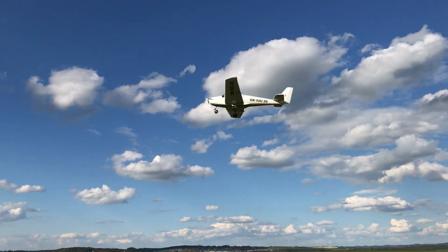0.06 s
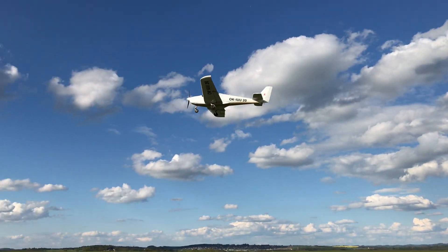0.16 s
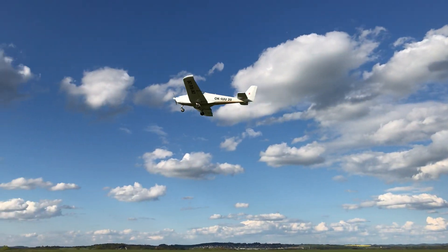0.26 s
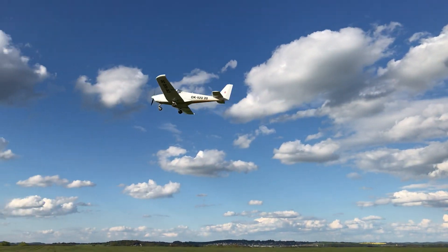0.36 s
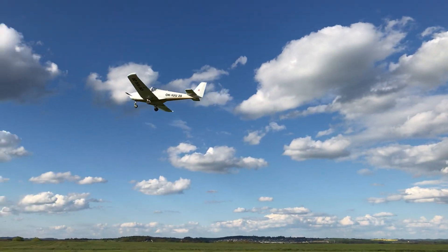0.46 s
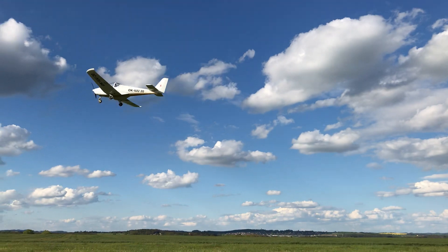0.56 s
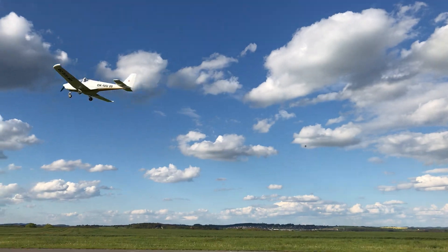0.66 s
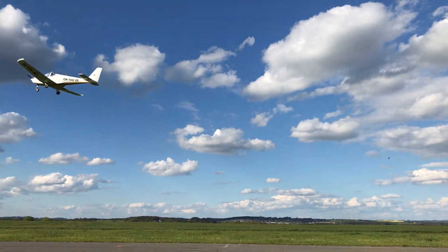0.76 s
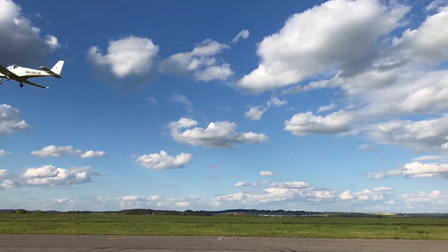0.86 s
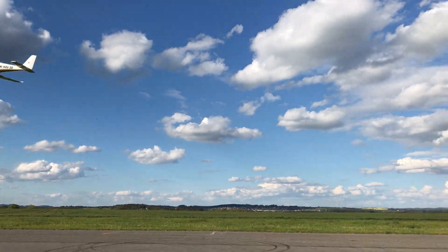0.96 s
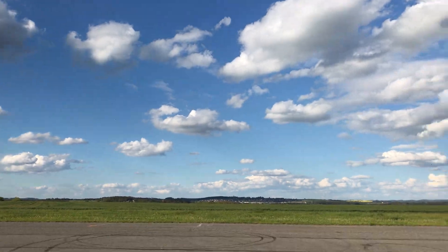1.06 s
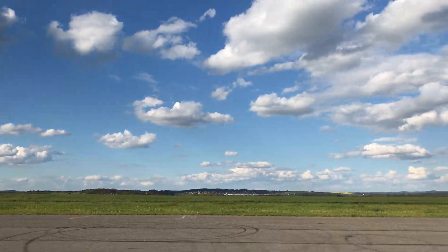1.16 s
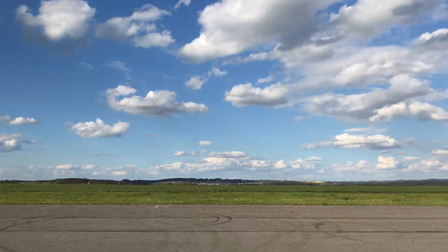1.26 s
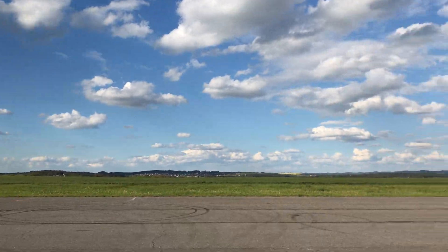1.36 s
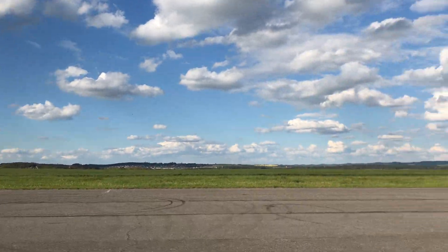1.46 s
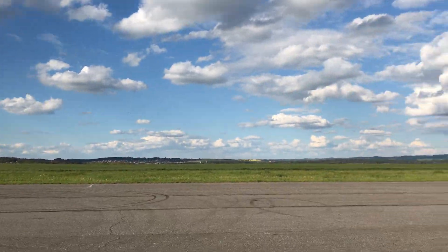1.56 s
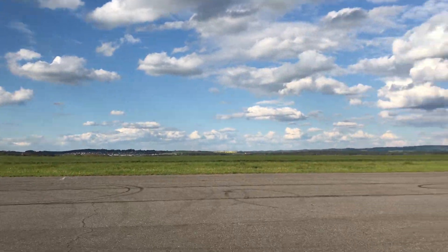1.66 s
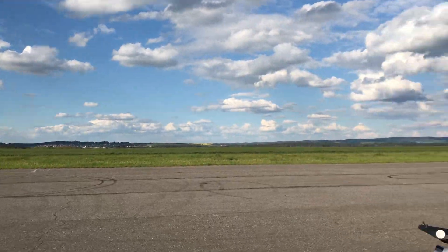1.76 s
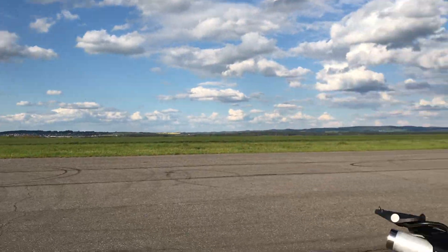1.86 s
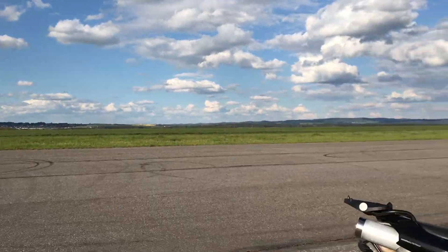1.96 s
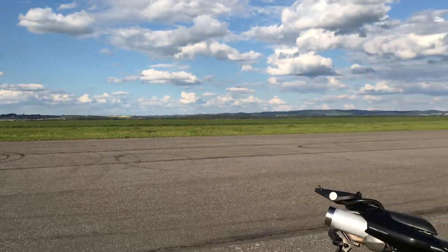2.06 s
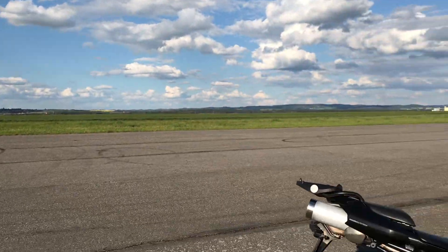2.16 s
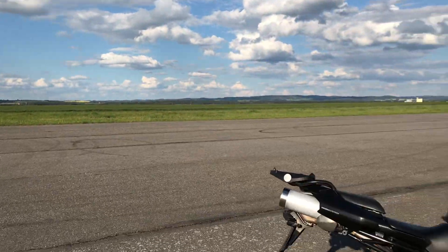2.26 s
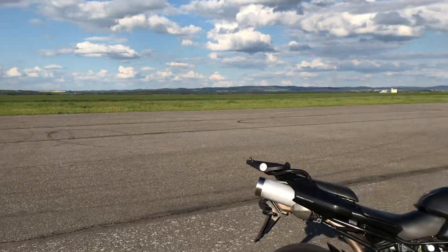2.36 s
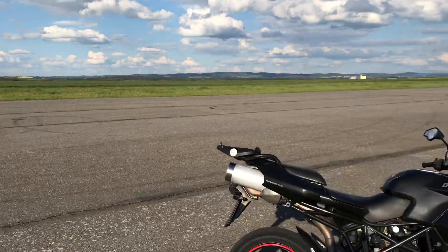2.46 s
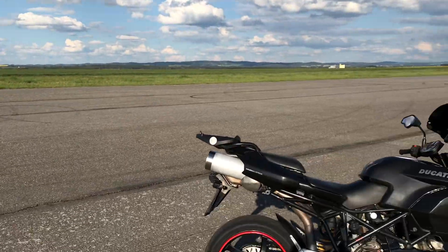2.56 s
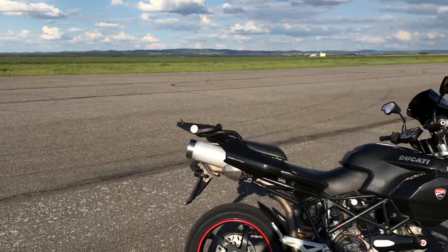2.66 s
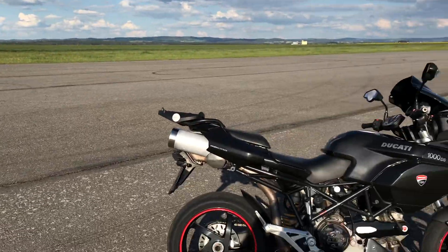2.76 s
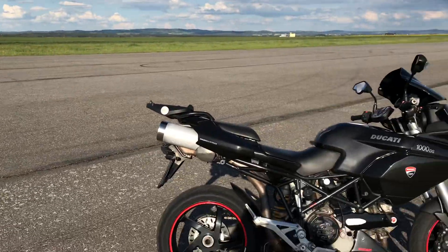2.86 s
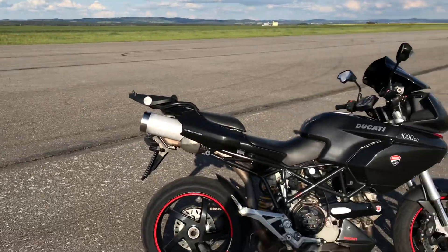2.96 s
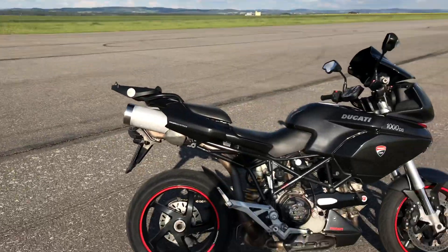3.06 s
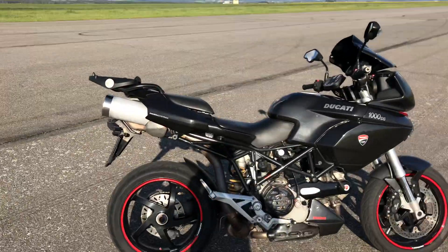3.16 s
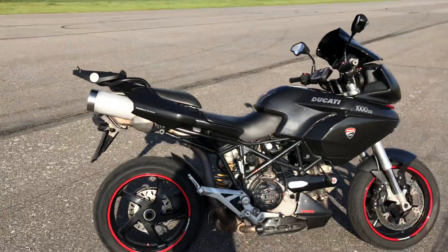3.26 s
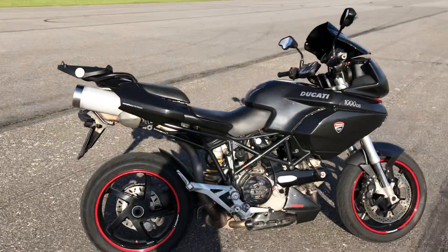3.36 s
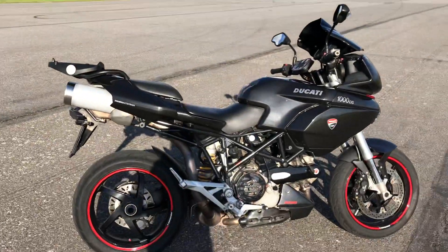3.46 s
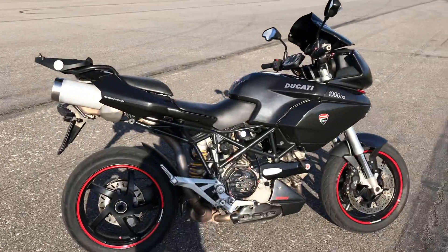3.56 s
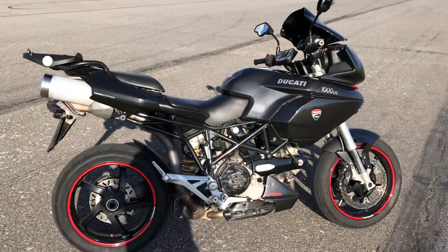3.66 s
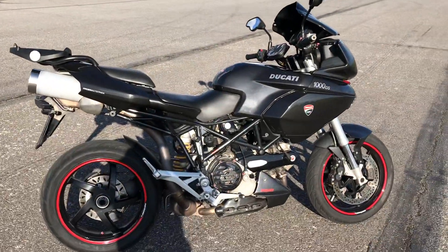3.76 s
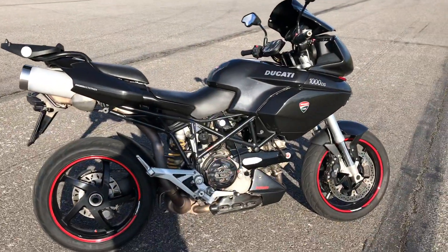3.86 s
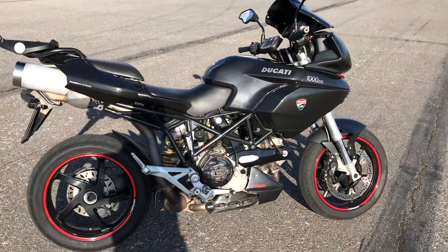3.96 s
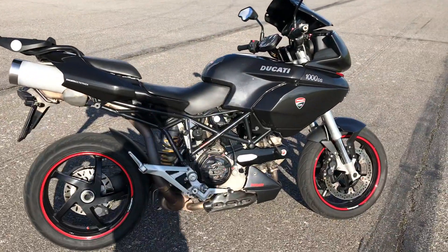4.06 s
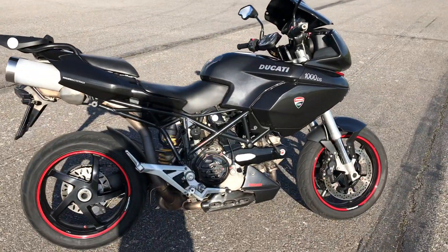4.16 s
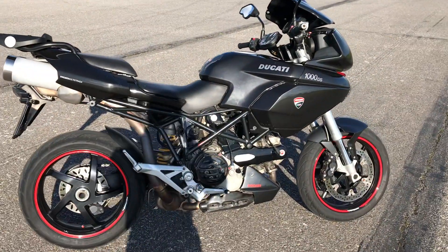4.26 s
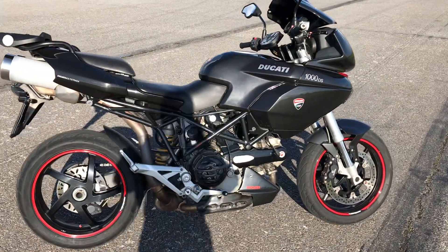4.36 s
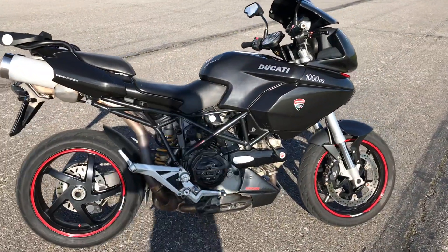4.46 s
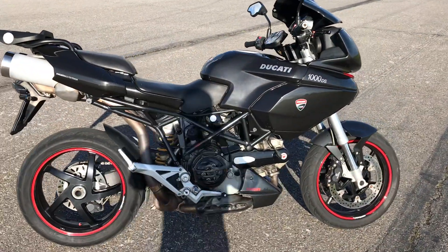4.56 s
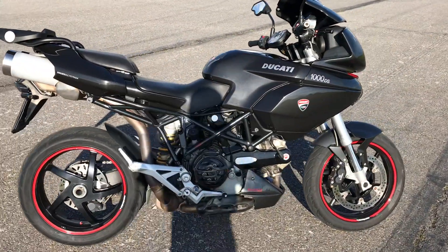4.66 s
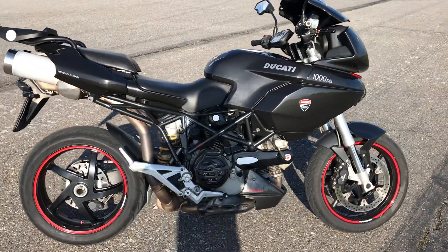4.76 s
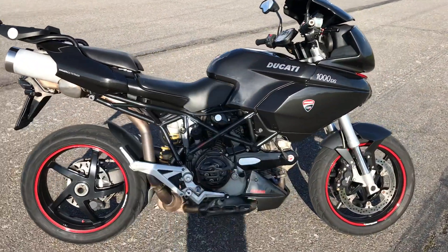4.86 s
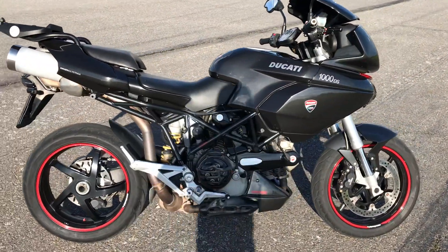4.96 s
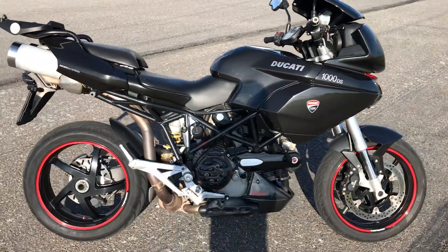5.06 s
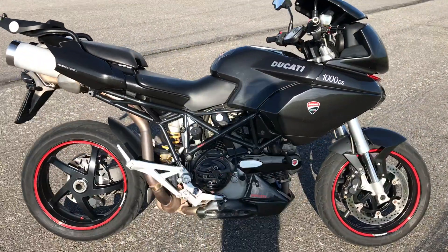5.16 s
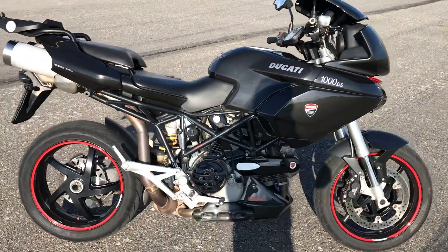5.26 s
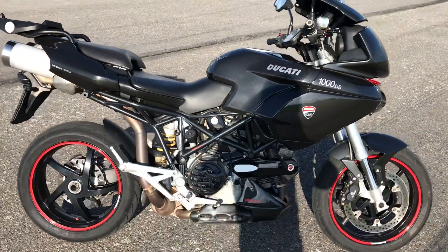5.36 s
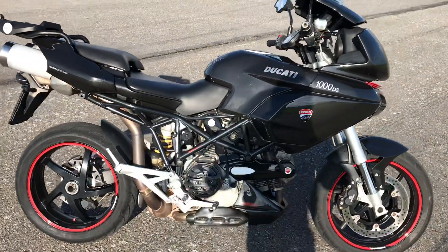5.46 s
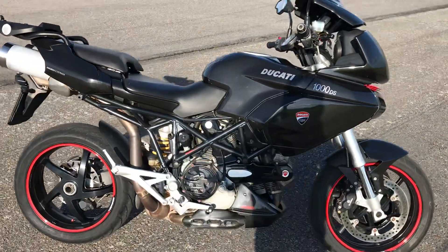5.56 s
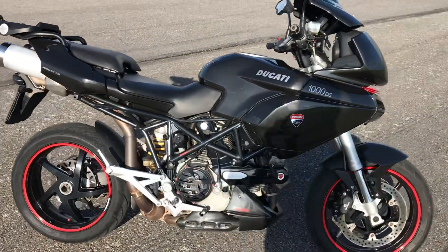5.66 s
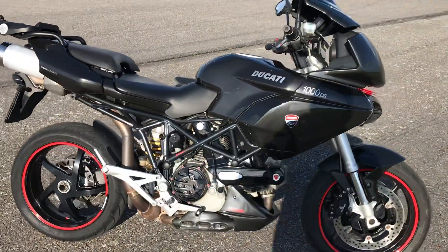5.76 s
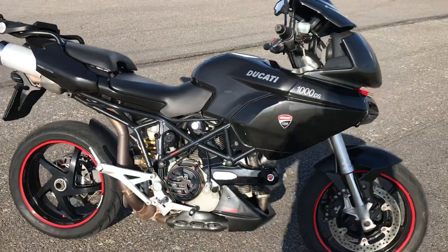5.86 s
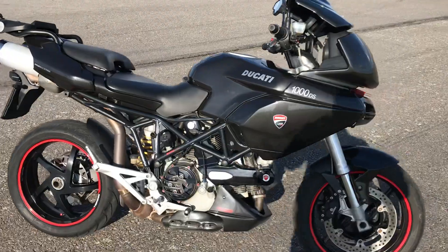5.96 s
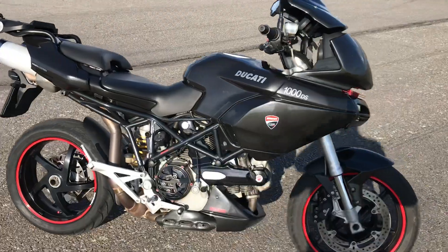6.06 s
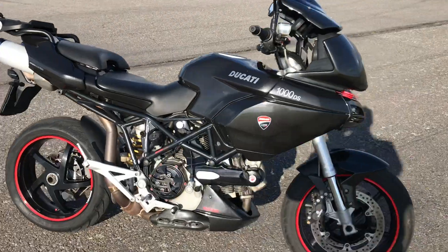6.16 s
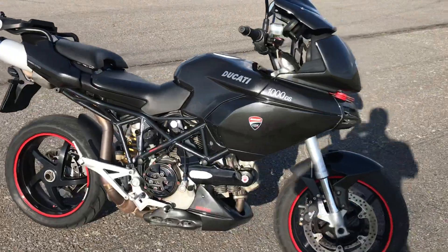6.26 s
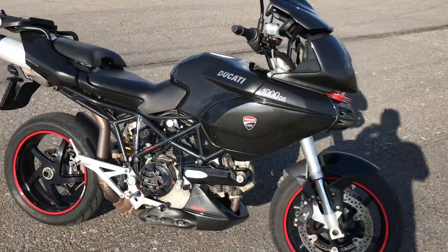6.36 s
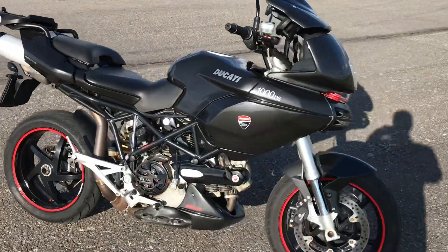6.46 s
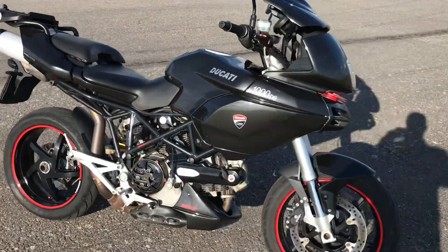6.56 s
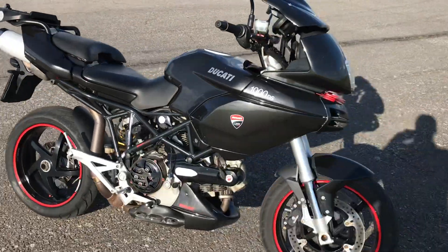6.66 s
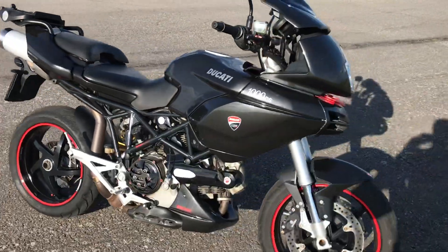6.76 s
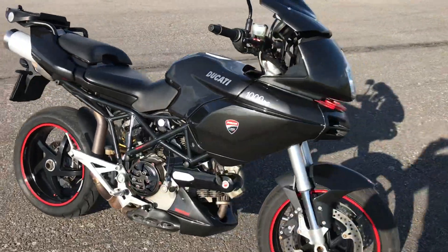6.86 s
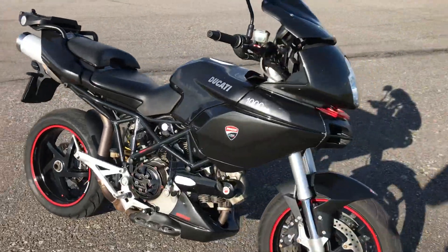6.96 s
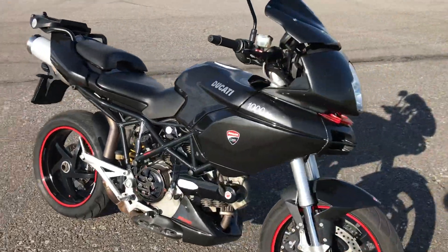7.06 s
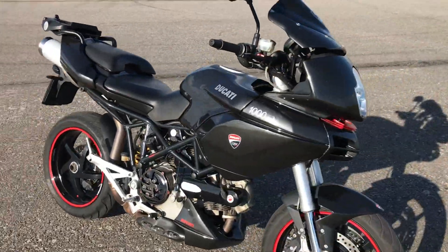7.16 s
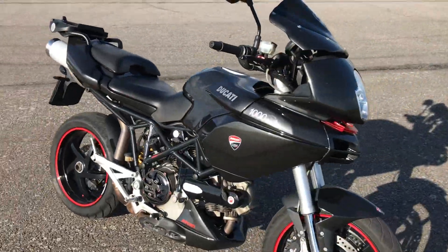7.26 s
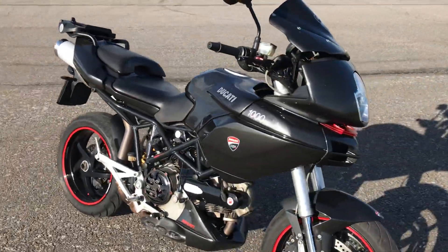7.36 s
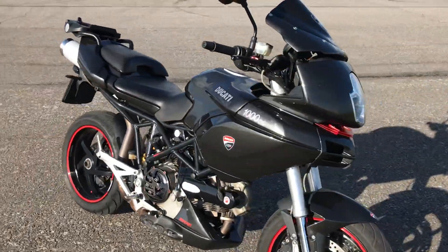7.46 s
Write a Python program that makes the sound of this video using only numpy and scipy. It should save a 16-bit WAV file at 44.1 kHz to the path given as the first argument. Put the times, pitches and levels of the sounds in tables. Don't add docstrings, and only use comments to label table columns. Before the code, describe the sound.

Raspy droning light aircraft passes close and recedes, growing dull and distant, followed by low wind buffets and thin bird chirps over an airfield.

```python
import sys
import numpy as np
from scipy import signal
from scipy.fft import rfft, irfft
from scipy.io import wavfile

SR = 44100
rng = np.random.default_rng(int(sys.argv[2]) if len(sys.argv) > 2 else 0)


def store_wav(level_fs):
    pcm = np.round(np.clip(np.atleast_2d(level_fs), -1, 1) * 32767)
    wavfile.write(sys.argv[1], SR, pcm.T.astype(np.int16))


def elevation(decibels):
    levels = np.asarray(decibels, float)
    return 10 ** (levels / 20)


N = 330750
TIME = np.arange(N) / SR
BLADES_PER_CYCLE = 1.758


def rms_one(x):
    return x / np.sqrt(np.mean(x ** 2) + 1e-20)


def in_time(rows):
    s, *columns = np.transpose(rows)
    return [np.interp(TIME, s, c) for c in columns]


def swells(rows):
    bells = [db * np.exp(-.5 * ((TIME - s) / length) ** 2) for s, db, length in rows]
    return np.max(bells, axis=0)


def by_bearing(behind, values):
    return np.interp(behind, np.linspace(0, 1, 3), values)


def drift(rate):
    r = np.exp(-80 * np.pi * rate / SR)
    slow = signal.lfilter([1], [1, -2 * r, r * r], rng.standard_normal(N // 40 + 2002))[2000:]
    return np.interp(np.arange(N) / 40, np.arange(len(slow)), rms_one(slow))


def colour(x, points):
    hz, db = np.transpose(points)
    grid = np.fft.rfftfreq(8192, 1 / SR) + 1
    gain = elevation(np.interp(np.log(grid), np.log(hz), db))
    cepstrum = irfft(np.log(gain))
    cepstrum[1:4096] *= 2
    response = irfft(np.exp(rfft(cepstrum[:4097], 8192)))
    return rms_one(signal.oaconvolve(x, response)[:N])


def band(x, edge_hz, kind, order=2):
    return signal.sosfilt(signal.butter(order, edge_hz, kind, fs=SR, output="sos"), x)


# pitch_hz, level_db (per Hz)
FIELD_SPECTRUM = [(40, -4), (300, -15.5), (1000, -16), (4000, 5), (7000, -16), (10000, -17), (15500, -18.5)]


def open_field():
    return elevation(-65.5) * colour(rng.standard_normal(N), FIELD_SPECTRUM)


# start_s, length_s, start_pitch_hz, end_pitch_hz, level_db
LARK_WHISTLES = [(4.533, 0.053, 3040, 3000, -48), (5.473, 0.04, 3580, 3600, -55.5),
                 (5.565, 0.018, 5900, 5750, -65), (5.583, 0.022, 5470, 5230, -58),
                 (5.645, 0.023, 5250, 5000, -60), (5.667, .015, 4400, 4450, -55),
                 (5.723, 0.018, 5250, 5000, -57), (5.782, 0.096, 3700, 3680, -50.5),
                 (6.54, .09, 4830, 4810, -55), (6.638, .03, 4800, 4300, -57),
                 (6.83, 0.017, 5400, 5550, -58), (6.853, .015, 5650, 5500, -63),
                 (6.928, 0.027, 3630, 3650, -51.5)]
# start_s, length_s, start_pitch_hz, end_pitch_hz, level_db
LARK_TRILLS = [
    (5.888, .15, 3680, 3630, -49.5),
    (6.177, 0.32, 3650, 3540, -48.5),
    (6.356, .082, 4660, 4700, -52.5),
    (6.391, 0.055, 3750, 3670, -43.5),
    (6.795, .03, 4900, 4300, -50),
    (6.915, .045, 4500, 4000, -49),
    (7.205, 0.021, 4170, 3440, -48),
    (7.29, .05, 3800, 3750, -52),
    (7.461, 0.028, 4180, 4160, -43.5),
]


def lark():
    trill_depth, throbs_per_s, swing_hz, breath_hz = 0.67, 95, 170, 460
    out = np.zeros(N)
    notes = [(*note, 0) for note in LARK_WHISTLES] + [(*note, trill_depth) for note in LARK_TRILLS]
    for s, length, start_hz, end_hz, db, trill in notes:
        u = np.arange(round(length * SR)) / SR
        throb = np.sin(2 * np.pi * throbs_per_s * u)
        hz = start_hz + (end_hz - start_hz) * u / length + swing_hz * trill * throb
        hz = hz + breath_hz * rng.standard_normal(len(u))
        shape = np.sin(np.pi * u / length) ** .5 * (1 - .5 * trill * (1 + throb))
        out[round(s * SR):][:len(u)] += elevation(db) * shape * np.sin(2 * np.pi * np.cumsum(hz) / SR)
    return out


# start_s, level_db
CASING_TICKS = [
    (6.853, -45),
]


def casing_tick():
    out = np.zeros(N)
    for s, db in CASING_TICKS:
        out[round(s * SR):][:60] = elevation(db) * rng.standard_normal(60) * np.exp(-np.arange(60) / 15)
    return band(out, (8000, 12500), "band", order=3)


# centre_s, rise_db, length_s
WIND_GUSTS = [(0, 13.5, 0.88), (1.7, 5, 0.095), (2.85, 7.5, 0.13), (3.953, 10.5, 0.073), (3.577, 7.5, 0.19),
              (4.21, 9, 0.33), (4.593, 5, 0.36), (4.97, 10.5, 0.16), (5.42, 9.5, 0.21),
              (5.685, 11.5, 0.075), (5.995, 2.5, 0.15), (6.855, 4.5, 0.21)]


def wind():
    breeze_db, all_bright_db = -43, 30.5
    gust_db = swells(WIND_GUSTS)
    white = band(rng.standard_normal(N), 48.4, "high", order=4)
    dull = rms_one(band(white, 97, "low", order=3))
    bright = rms_one(band(white, 177, "low", order=3))
    share = np.clip(0.48 + gust_db / all_bright_db / 2, 0, 1)
    lumps_db = 3.2 * drift(24)
    return elevation(breeze_db + gust_db + 1 + lumps_db) * ((1 - share) * dull + share * bright)


# centre_s, peak_db, top_hz, length_s
PORT_BUFFETS = [(3.523, -15.5, 121, 0.0072), (3.668, -21, 526, 0.004), (4.232, -45, 397, 0.0091),
                (4.367, -25, 296, 0.011), (4.752, -29, 800, 0.0028), (4.942, -14.5, 226, 0.018),
                (5.012, -15, 624, 0.0039), (5.047, -14, 515, 0.0069), (5.059, -12.5, 118, 0.0099),
                (5.443, -15.5, 690, 0.0057), (5.458, -22, 1100, 0.0046), (5.466, -7.5, 400, 0.0084),
                (5.484, -21, 304, 0.0097), (5.575, -27, 504, 0.01), (5.667, -25, 620, 0.011),
                (5.704, -22, 193, 0.0083), (5.731, -25, 620, 0.0071), (5.899, -29.5, 900, 0.0027),
                (6.02, -41.5, 200, 0.012), (6.878, -23, 110, 0.0052)]
# centre_s, peak_db, top_hz
PORT_EDDIES = [(3.418, -22, 114), (3.458, -19.5, 163), (3.512, -43, 120), (3.556, -16.5, 186),
               (3.591, -19.5, 150), (3.624, -30, 150), (3.655, -20.5, 159.7), (3.695, -17.5, 175),
               (3.737, -25, 170), (3.786, -31.5, 95), (3.838, -28.5, 161), (3.904, -23.5, 115),
               (3.97, -24, 185), (3.993, -25.5, 129), (4.051, -26.5, 140), (4.097, -26.5, 135),
               (4.192, -26.5, 181), (4.244, -20.5, 170), (4.265, -20, 171), (4.285, -18.5, 178),
               (4.401, -32.5, 140), (4.463, -24, 128), (4.496, -24, 150), (4.547, -23.5, 131),
               (4.584, -21, 120), (4.7, -23.5, 141), (4.765, -23, 142), (5.099, -31.5, 139),
               (5.164, -22.5, 161), (5.402, -22, 120), (5.519, -29.5, 190), (5.631, -27, 151),
               (5.861, -28, 198), (5.908, -27.5, 105), (6.006, -20.5, 129), (6.206, -27.5, 100)]


def buffets():
    eddy_cycles, push_share, push_pitch = 1.01, 1.23, 0.498
    rows = PORT_BUFFETS + [(s, db, hz, eddy_cycles / hz) for s, db, hz in PORT_EDDIES]
    out = np.zeros(N)
    around = np.arange(-4000, 4000) / SR
    for s, db, top_hz, length in rows:
        dull = band(rng.standard_normal(8000), top_hz, "low", order=4)
        rush = rms_one(band(dull, 0.11 * top_hz, "high"))
        push = push_share * np.cos(2 * np.pi * push_pitch * top_hz * around)
        puff = (rush - push) * np.exp(-.5 * (around / length) ** 2)
        out[round(s * SR) - 4000:][:8000] += elevation(db) * puff / np.abs(puff).max()
    return band(out, 45, "high", order=3)


# time_s, lag_ms
ECHO_DELAY = [(0, 3.2), (.45, 3.22), (1, 2.86), (1.4, 2.5), (1.75, 2.14), (2.2, 1.82), (2.6, 1.56),
              (3.1, 1.3), (4.3, 1.24), (4.6, 1.03), (7.5, 1.07)]


def flight():
    speed_m_s, nearest_m, nearest_s = 39.37, 63.55, .098
    cycles_per_s, spin_up_per_s = 47.982, .00124
    throttle_s, throttle_per_s = 6.8, .008
    along = speed_m_s * (TIME - nearest_s)
    bearing = along / np.hypot(along, nearest_m)
    pushed = throttle_per_s * np.maximum(TIME - throttle_s, 0)
    revs = cycles_per_s * (1 + spin_up_per_s * TIME + pushed)
    heard_per_s = revs / (1 + speed_m_s * bearing / 343)
    return heard_per_s, in_time(ECHO_DELAY)[0], np.clip((bearing - 0.18) / 0.73, 0, 1)


# place_cycles, level_db
CYLINDER_FIRINGS = [
    (0, 4.5),
    (.26, -.5),
    (.53, -9),
    (.82, -9),
]


def firings(cycle, jitter_ms, spread_db, pattern):
    place, db = np.transpose(CYLINDER_FIRINGS)
    cycles = int(cycle[-1])
    turns = (np.arange(cycles)[:, None] + place).ravel()
    luck = rng.standard_normal((len(turns), 2))
    at = np.interp(turns, cycle, np.arange(N)) + jitter_ms * SR / 1000 * luck[:, 0]
    at = np.clip(at, 0, N - 2)
    size = elevation(pattern * np.tile(db, cycles) + spread_db * luck[:, 1])
    whole, part = at.astype(int), at % 1
    return np.bincount(whole, size * (1 - part), N) + np.bincount(whole + 1, size * part, N)


# pitch_hz, level_db (per Hz)
RASP_SPECTRUM = [(120, -31), (250, 3.5), (400, 1.5), (700, 1.5), (1300, -1), (1900, -5), (2700, -8.5),
                 (3300, -6.5), (4300, -7.5), (4800, -6), (7000, -16), (10400, -30), (11300, -29.5),
                 (15500, -38)]


def gas_rasp(cycle, far):
    crack_s, burst_s, crack_share = .0009, .0082, 1.4
    crackles_per_s, crackle_db, crackle_fades_db = 350, -3, -7
    blows = firings(cycle, jitter_ms=.1, spread_db=1.5, pattern=0.8)
    bursts = signal.lfilter([1], [1, -np.exp(-1 / (burst_s * SR))], blows)
    bursts += crack_share * signal.lfilter([1], [1, -np.exp(-1 / (crack_s * SR))], blows)
    bursts = rms_one(band(bursts, 900, "low", order=1))
    gate = .36 + .15 * far + (1 - .3 * far) * bursts
    rasp = colour(rng.standard_normal(N) * gate, RASP_SPECTRUM)
    rasp = rasp - .45 * band(rasp, 1500, "low", order=1)
    struck = rng.random(N) < crackles_per_s * bursts ** 2 / SR
    pop_size = elevation(3.5 * np.minimum(rng.exponential(1, N), 4))
    pops = struck * pop_size * rng.choice([-1, 1], N)
    crackle = band(colour(pops, RASP_SPECTRUM), (2500, 7500), "band")
    return rasp + elevation(crackle_db + crackle_fades_db * far) * crackle


# pitch_hz, level_db
PULSE_SPECTRUM = [(30, -12.5), (90, 23), (180, -1), (350, 3.5), (700, 3.5), (1400, 3.5), (2000, -10.5),
                  (2700, -6.5), (4000, -24), (8000, -53.5), (16000, 2.5)]


def exhaust_pulses(knocks, far):
    middle_hz, middle_db = (240, 1650), -6
    rattle = rfft(rng.standard_normal(600) * np.exp(-np.arange(600) / SR / 0.0005))
    rattle = irfft(rattle / np.abs(rattle))
    rattled = signal.oaconvolve(knocks, rattle)[:N]
    pulses = 0.6 * colour(knocks, PULSE_SPECTRUM) + 0.61 * colour(rattled, RASP_SPECTRUM)
    pulses = band(pulses, 6300, "low", order=6)
    below = band(pulses, middle_hz[0], "low", order=3)
    above = band(pulses, middle_hz[1], "high", order=3)
    return elevation(-1 + far) * (below + above + elevation(middle_db) * band(pulses, middle_hz, "band"))


# centre_s, rise_db, length_s
PIPE_LINED_UP = [
    (.65, 4, .15),
    (1.33, 7, .14),
    (2.06, 8, .12),
    (2.6, 3, .15),
    (6.35, 6, .12),
    (7.2, 5, .2),
]


def tailpipe_ring(knocks, behind, far):
    ring_db = by_bearing(behind, (-13, -10.5, -10.5)) - 5 * far + swells(PIPE_LINED_UP)
    astern = .8 * np.clip((TIME - 1.5) / .4, 0, 1)
    wide = rms_one(band(knocks, (2380, 2900), "band"))
    narrow = rms_one(band(knocks, (2450, 2680), "band"))
    return elevation(ring_db) * ((1 - astern) * wide + astern * narrow)


def lines(multiples, cycle, rows, behind, scatter):
    step, out = 30, np.zeros(N)
    for k, db in zip(multiples, rows):
        level_db = by_bearing(behind[::step], db) + 1.8 * drift(1.5)[::step]
        gain = np.repeat(elevation(level_db), step)[:N]
        out += gain * np.cos(2 * np.pi * (k * cycle + scatter * rng.random()))
    return out


# side_db, quarter_db, behind_db
BLADE_OVERTONES = [
    (2, -7, -23.5),
    (-5, -6.5, -16.5),
    (-16, -22.5, -20),
]
# side_db, quarter_db, behind_db
CHOPPED_WHINE = [(-25, -20, -4), (-13, -6.5, -6), (-7.5, -1.5, -11.5), (-11, -0.5, -19.5), (-5, -7, -26),
                 (1, -14, -31), (-10.5, -13, -32), (-5.5, -13, -17), (-7, -24.5, -39.5), (-9, -26, -26),
                 (-9, -29.5, -24.5), (-20.5, -26.5, -25)]
# side_db, quarter_db, behind_db
ENGINE_ORDERS = [(-23.5, -19.5, -14), (-12.5, -7.5, -20.5), (-9.5, -11.5, -15.5), (-7, -9, -20),
                 (-17, -16, -11), (-24.5, -27, -12.5), (-15, -7, -17.5), (-18, -19.5, -14.5),
                 (-6.5, -6.5, -11.5), (-13.5, -10, -12.5), (-21.5, -11.5, -7.5), (-15.5, -18.5, -29),
                 (-31, -24, -29), (-22, -7.5, -15), (-20, -12.5, -19), (-11.5, -11.5, -12), (-22, -19, -23),
                 (-6, -9.5, -13), (-5, 0, -18.5), (-19.5, -9, -17.5), (-14, -21, -20), (-23.5, -17, -11.5),
                 (-11, -6, -10.5), (-28, -20.5, -9), (-3.5, -4.5, -14.5), (-10.5, -15, -9.5),
                 (-10, -13.5, -7), (-14.5, -29, -10.5), (-5.5, -21, -16), (-12.5, -41, -13),
                 (-6.5, -28, -15.5)]


def spinning_lines(cycle, behind):
    whine_per_cycle = 19
    overtones = BLADES_PER_CYCLE * np.arange(3, 6)
    side_tones = whine_per_cycle + BLADES_PER_CYCLE * np.arange(-3, 9)
    whine_db = -4 + np.clip(TIME - 3.4, 0, 1) * (4 * drift(6) - 5)
    out = elevation(-3.5) * lines(overtones, cycle, BLADE_OVERTONES, behind, scatter=.1)
    out += elevation(whine_db) * lines(side_tones, cycle, CHOPPED_WHINE, behind, scatter=.1)
    return out + elevation(-5) * lines(np.arange(5, 36), cycle, ENGINE_ORDERS, behind, scatter=.35)


# time_s, share
BASS_BOUNCE = [
    (0, 0.25),
    (1.2, 0.11),
    (1.9, 0.12),
    (3, 0.39),
    (4.6, 0.076),
    (6.4, 0.0037),
    (7, -0.41),
    (7.5, -0.08),
]


def ground_echo(source, lag_ms, behind, far):
    lag = (lag_ms + 0.011 * drift(11) + 0.07 * far * drift(25)) * SR / 1000
    late = np.arange(N) - lag
    bounced = np.interp(late, np.arange(N), band(source, 10000, "low", order=1))
    bass = np.interp(late, np.arange(N), band(source, 550, "low", order=1))
    share = np.clip(by_bearing(behind, (0.6, 0.76, 0.66)) - 0.31 * far, 0, 1)
    return rms_one(source + in_time(BASS_BOUNCE)[0] * bass + share * bounced)


# pitch_hz, level_db
LATE_COLOUR = [(300, -4), (600, 3.5), (1000, 3), (1350, -7.5), (1850, 7.5), (2500, 1), (3700, 0),
               (5000, -3), (8000, -7.5)]


def changing_colour(x):
    change_s, lasts_s = 4.02, 0.99
    changed = np.clip((TIME - change_s) / lasts_s, 0, 1)
    return (1 - changed) * x + changed * colour(x, LATE_COLOUR)


def twinkle(x, edges_hz, far):
    below = [0] + [band(x, hz, "low", order=4) for hz in edges_hz] + [x]
    return sum(elevation((.3 + .5 * far) * drift(5)) * (up - down) for down, up in zip(below, below[1:]))


# time_s, level_db, treble_lost_db
AIR_PATH = [(0, -20, 1.5), (.3, -18.5, 2.5), (.7, -20, 4.5), (1.15, -24, 1.5), (1.7, -23.5, 9.5),
            (2.0, -24, 15.5), (2.45, -26, 13.5), (2.8, -29, 17), (3.15, -29, 17.5), (3.3, -31, 23),
            (3.7, -34, 22.5), (4.4, -37, 23), (5.33, -35.5, 20.5), (5.55, -42.5, 15.5), (6.06, -34.5, 26),
            (6.6, -39, 19.5), (7.05, -40, 23.5), (7.5, -33, 20.5)]
# centre_s, rise_db, length_s
CLEAR_POCKETS = [(1.25, -1.5, 0.2), (2.11, 5, 0.11), (2.32, 6.5, 0.082), (3.02, 4.5, 0.032), (3.49, 8, 0.1),
                 (4.13, 5, 0.18), (4.9, 4.5, 0.19), (5.33, 8, 0.098), (6.05, 8, 0.09), (6.4, 7.5, 0.11),
                 (6.93, 5.5, 0.12), (7.3, 3.5, .1)]


def through_air(x, far):
    body_db, lost_db = in_time(AIR_PATH)
    lost_db = lost_db - swells(CLEAR_POCKETS)
    rasp_db = body_db - 0.5 - 0.67 * lost_db
    edge_db = body_db - 7 - 1.2 * lost_db
    body, high = band(x, 1920, "low", order=4), band(x, 2240, "high", order=4)
    rasp, edge = band(high, 4270, "low", order=4), band(high, 6800, "high", order=4)
    duller = elevation(-34 * np.clip((TIME - 1.6) / .5, 0, 1))
    edge = band(edge, 10840, "low", order=4) + duller * band(edge, 12400, "high", order=4)
    eddies = drift(8)
    heard = elevation(body_db - 2.5 + 0.21 * drift(21)) * twinkle(rms_one(body), (500, 1100), far)
    heard += elevation(rasp_db + .3 * eddies + 1.1 * drift(39)) * twinkle(rms_one(rasp), (2300, 3200, 4100), far)
    heard += elevation(edge_db + .5 * eddies + 1.7 * drift(14)) * twinkle(rms_one(edge), (7000, 9000), far)
    return heard


def throttle_boom(gas):
    opens_s, rises_s = 6.8, 0.17
    opened = np.clip((TIME - opens_s) / rises_s, 0, 1)
    return elevation(-48) * opened * rms_one(band(gas, (210, 370), "band"))


# time_s, drone_db, firing_db
DRONE_LEVELS = [(0, -25, -40), (.12, -21.5, -31), (.5, -15, -36.5), (.8, -16, -50), (1.3, -17, -40),
                (1.85, -21, -39), (2.1, -23.5, -34.5), (2.6, -25, -36.5), (2.9, -34, -41.5),
                (3.7, -36.5, -41), (4.2, -41.5, -57), (6.45, -53, -49), (7.05, -44.5, -43),
                (7.5, -42, -40.5)]


def blade_drone(cycle, behind):
    drone_db, firing_db = in_time(DRONE_LEVELS)
    octave_db = drone_db + by_bearing(behind, (-21, -15.5, -18))
    turn = 2 * np.pi * cycle
    out = elevation(firing_db + 1.2 * drift(5.7)) * np.sin(len(CYLINDER_FIRINGS) * turn)
    out += elevation(octave_db) * np.sin(2 * BLADES_PER_CYCLE * turn)
    out += elevation(drone_db + 0.24 * drift(5.2)) * np.sin(BLADES_PER_CYCLE * turn)
    return np.sqrt(2) * out


def plane():
    heard_per_s, lag_ms, behind = flight()
    far = np.clip((TIME - 1.5) / 2.2, 0, 1)
    cycle = .15 + .09 * np.exp(-TIME / 1.2) + np.cumsum(heard_per_s) / SR
    knocks = firings(cycle, jitter_ms=.012, spread_db=.8, pattern=1.25)
    pulses, gas = exhaust_pulses(knocks, far), gas_rasp(cycle, far)
    source = pulses + gas + tailpipe_ring(knocks, behind, far)
    source += elevation(-6) * band(pulses, (3600, 4000), "band")
    source += spinning_lines(cycle, behind)
    combed = changing_colour(ground_echo(source, lag_ms, behind, far))
    return through_air(combed, far) + throttle_boom(gas) + blade_drone(cycle, behind)


def scene():
    return (open_field() + lark() + casing_tick() + wind() + buffets() + plane())[None]


def band_limit(x):
    return signal.sosfilt(signal.butter(12, 15680, fs=SR, output="sos"), x)


# pitch_hz, level_db
PORT_RESPONSE = [(1750, 0), (2100, -4.5), (2450, .5), (2900, 1), (3250, -5.5), (3650, 1.5), (4400, .5),
                 (4900, -5), (5700, 2), (6500, 0), (7100, 1), (7800, -4), (8800, 0), (9600, 1), (10400, -5),
                 (11100, 0), (12000, -2), (13000, 0), (15500, -2)]


def record(dry):
    level = np.sqrt(np.mean(dry ** 2))
    ported = colour(dry[0], PORT_RESPONSE)[None] * level
    rounded = 1.532 * np.tanh(ported / 1.48)
    top_cut = signal.cheby2(16, 30, 15800, fs=SR, output="sos")
    return band_limit(signal.sosfilt(top_cut, rounded))


dry = scene()
out = record(dry)
store_wav(out)
```